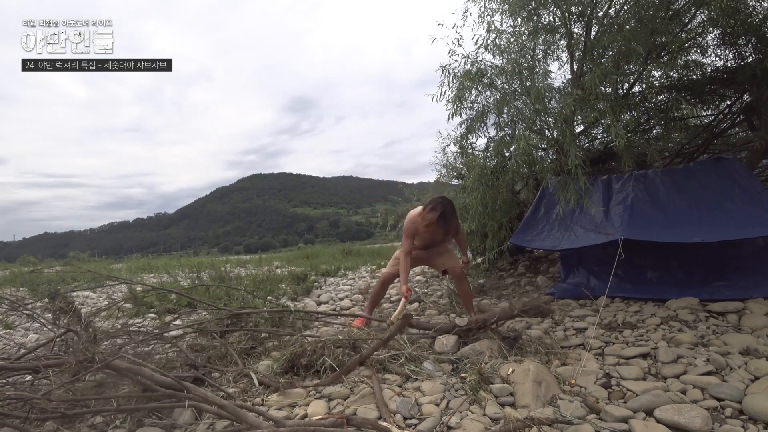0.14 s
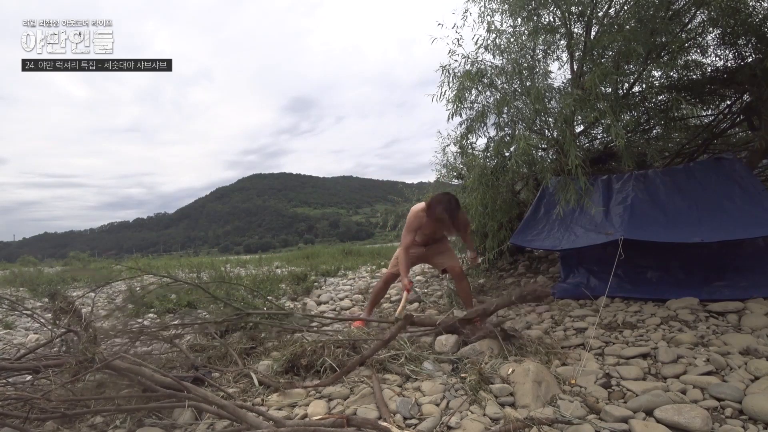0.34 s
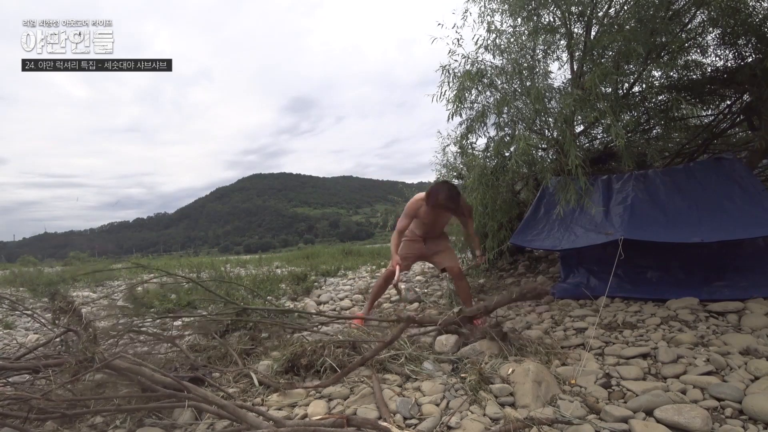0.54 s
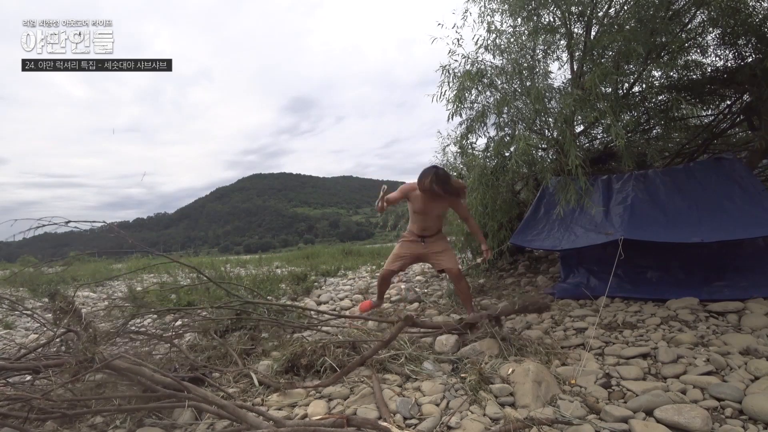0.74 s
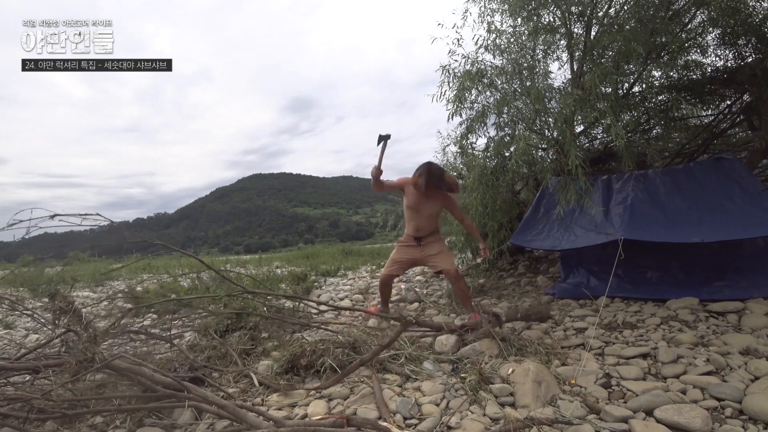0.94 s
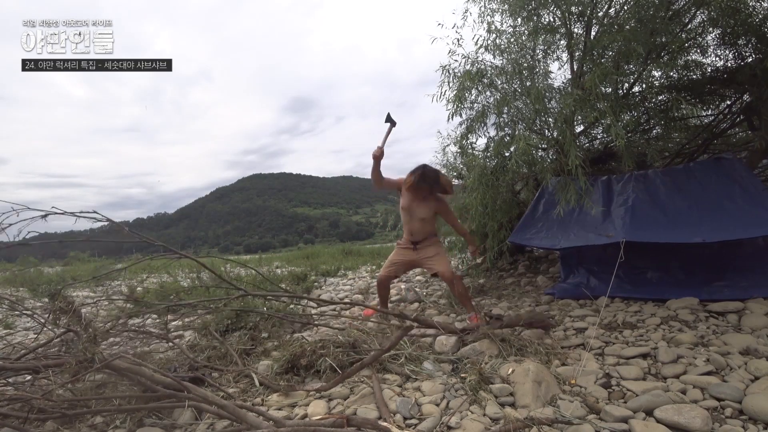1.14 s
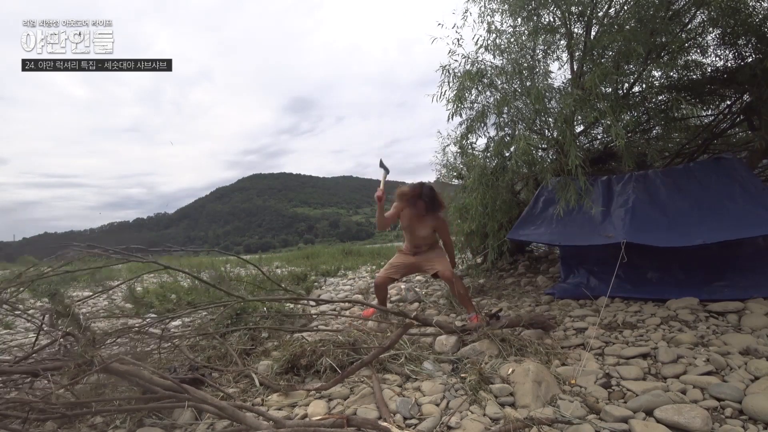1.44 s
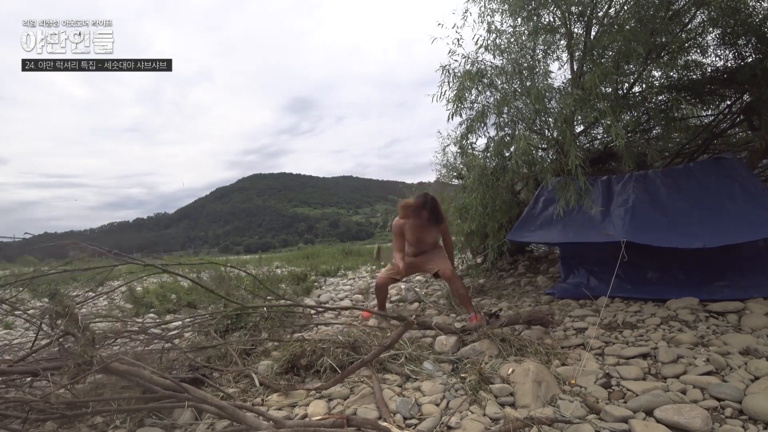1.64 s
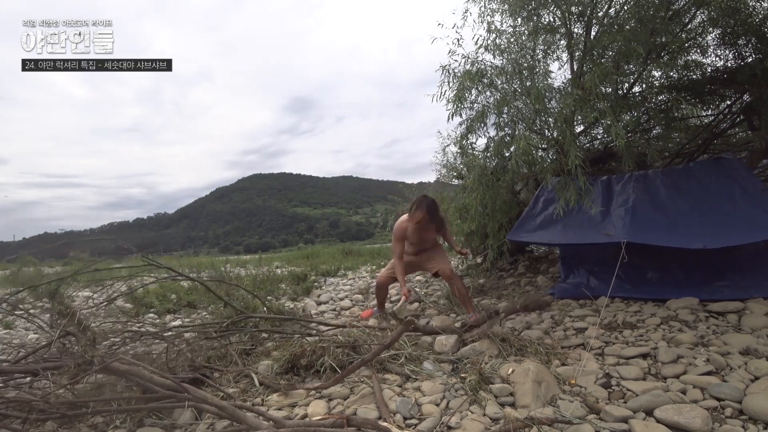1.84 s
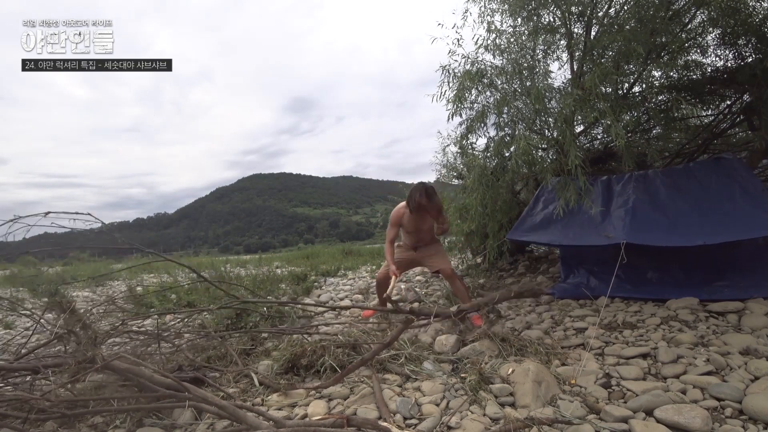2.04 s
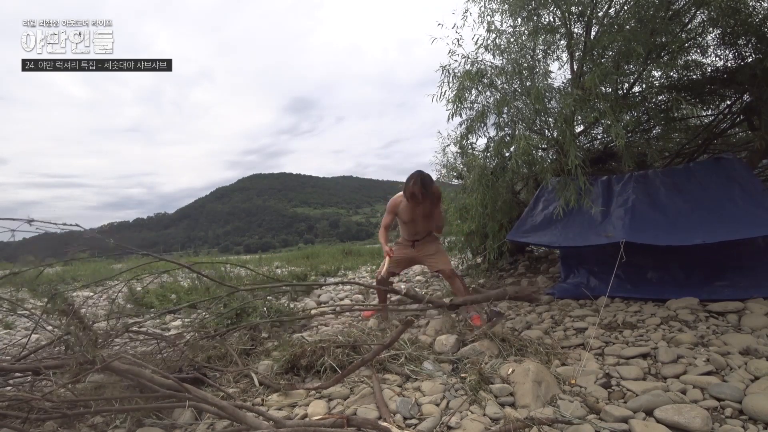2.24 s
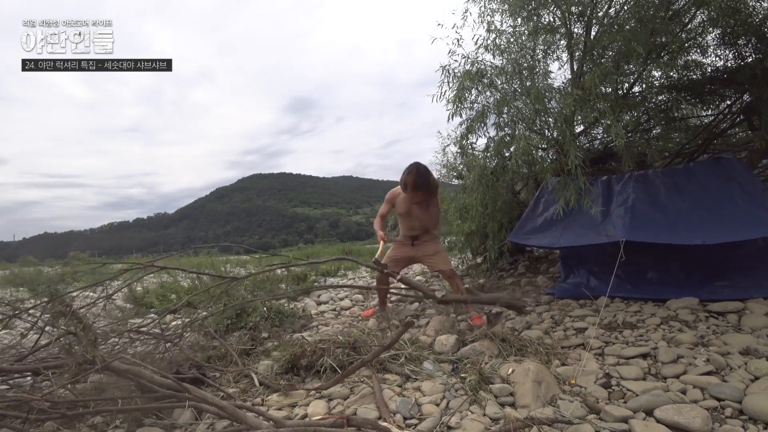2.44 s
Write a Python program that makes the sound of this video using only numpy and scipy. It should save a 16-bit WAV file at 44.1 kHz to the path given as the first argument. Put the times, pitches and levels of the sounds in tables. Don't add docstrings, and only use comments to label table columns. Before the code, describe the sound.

Two sharp hatchet hits on a branched log on an open stony riverbank, each followed by crackling, clashing twigs; between them wood knocks and drags softly on stones. Small camera microphone, little deep bass or extreme treble.

```python
import sys
import numpy as np
from scipy import signal
from scipy.fft import rfft, irfft, next_fast_len
from scipy.io import wavfile
from scipy.ndimage import uniform_filter1d

SR = 44100
rng = np.random.default_rng(int(sys.argv[2]) if len(sys.argv) > 2 else 0)


def gain_from_db(level_db):
    decades = np.asarray(level_db, float) / 20
    return 10 ** decades


def dump_mix(stems):
    frames = np.atleast_2d(stems).T
    limited = np.clip(frames, -1, 1)
    pcm = np.round(limited * 32767).astype(np.int16)
    wavfile.write(sys.argv[1], SR, pcm)


N = 114660
T = np.arange(N) / SR

# start_s, level_db (peak), pitch_hz (crack), decay_s (crack), thud_db
BLOWS = [(.2470, -2, 3130, 0.0019, -11.5), (.2487, -11.5, 1600, .0025, -6),
         (.2525, -12.5, 2230, 0.0069, -3), (.2553, -6.5, 3320, 0.0037, -14),
         (.2828, -5.5, 1250, 0.0034, -4.5), (.292, -12.5, 1320, 0.0036, -5), (.2815, -7, 2230, 0.0037, -7),
         (1.7915, -8.5, 3080, 0.0029, -20), (1.793, -4, 2400, 0.0031, -21), (1.800, -11, 1470, 0.0089, -11),
         (1.8145, -6, 2100, 0.004, -15), (1.820, -10, 2380, 0.0091, -9), (1.838, -11.5, 1580, 0.0069, -7),
         (1.843, -14, 1650, 0.0033, -6), (1.827, -18, 820, 0.0044, -5)]
# start_s, level_db (peak), pitch_hz, decay_s
BOOMS = [
    (.249, -19, 290, .01),
    (.283, -24, 270, .007),
    (1.814, -20, 510, .012),
    (1.80, -26, 330, .008),
]
# start_s, level_db (peak), pitch_hz, decay_s
KNOCKS = [(0.905, -24, 900, .003), (0.909, -17.5, 500, 0.0052), (.968, -31, 700, .003),
          (.937, -31, 1250, 0.003), (1.277, -27.5, 710, 0.0021), (2.213, -26.5, 1000, 0.0075),
          (2.33, -27, 1100, .004), (0.929, -24, 1110, 0.017), (0.952, -32, 1200, 0.0035),
          (1.025, -23, 1210, 0.014), (1.084, -22, 1110, 0.0022), (1.097, -27, 800, 0.0032),
          (1.141, -24.5, 905, 0.0033), (1.198, -24.5, 1010, 0.0042), (1.31, -22.5, 470, 0.0085),
          (1.333, -29, 965, 0.0034), (1.395, -25.5, 1030, 0.0077), (1.415, -25.5, 880, 0.0065),
          (1.454, -24, 450, 0.0064), (1.473, -27, 480, 0.0035), (1.687, -26, 483, 0.0091),
          (1.726, -26, 970, 0.0091), (2.274, -28, 1300, 0.0079), (2.319, -26, 865, 0.0059),
          (2.454, -27, 447, 0.0045), (2.574, -31, 1260, 0.0063)]
# start_s, level_db (peak), pitch_hz, decay_s, brightness_db
SNAPS = [(0.2887, -23, 5270, 0.001, -8), (.2883, -12, 11100, .0007, -6), (.2965, -24, 5000, .0015, -12),
         (0.2597, -7, 3240, .001, -14), (.3515, -21, 6200, 0.0011, -6), (0.366, -14, 5200, .0015, -8),
         (0.3715, -6, 3700, 0.0015, -9), (0.4047, -16, 2470, 0.0026, -12), (0.409, -12, 3210, .0015, 3.5),
         (.4172, -7, 6300, 0.0016, -1), (.4215, -6.5, 3450, 0.0042, -15), (.4245, -18, 10500, .001, -6),
         (0.4602, -9.5, 3380, 0.0044, -12), (.497, -9.5, 2460, 0.012, -24), (.4995, -8, 2520, .002, -14),
         (.506, -26, 8000, .0012, -7), (0.527, -16, 5770, 0.0017, -9), (.815, -24.5, 2780, 0.0037, -14),
         (0.85, -23.5, 2880, 0.0084, -6), (1.084, -26, 9800, .0012, 1), (1.0897, -22.5, 4020, 0.0028, 1),
         (1.1095, -21, 3630, 0.0022, -11), (1.1266, -14.5, 5400, 0.00092, 4),
         (1.1269, -14, 2590, 0.00056, 4.5), (1.1294, -22.5, 3000, 0.0034, 9),
         (1.274, -25, 3540, 0.0039, -6), (1.541, -19, 2350, 0.002, -14), (1.555, -19.5, 2720, 0.0044, -11),
         (1.593, -27.5, 3460, 0.0059, -3), (1.6653, -21, 4000, 0.002, -2), (1.6998, -23, 5000, 0.0013, 5.5),
         (1.7017, -18.5, 5060, 0.00062, 4.5), (1.787, -24, 3070, .004, -8),
         (1.7932, -10.5, 5040, .0014, -8), (1.839, -19, 6460, 0.0017, -8), (1.8665, -24, 5940, 0.0016, -3),
         (2.005, -12.5, 3450, 0.0047, -2), (2.0946, -20, 2140, 0.004, -2),
         (2.242, -14.5, 2670, 0.0038, -13), (2.522, -21.5, 2860, 0.0069, -18)]
# peak_s, level_db, rise_s (before the peak), decay_s (after it)
BURSTS = [(0.34, -20.5, 0.016, 0.013), (0.367, -17.5, 0.0033, 0.01), (0.4, -19.5, 0.0086, 0.031),
          (0.45, -23, 0.0021, 0.026), (0.51, -23.5, 0.015, 0.0083), (0.5, -36, 0.0053, 0.007),
          (1.395, -44, .003, 0.0094), (2.455, -37, 0.0069, 0.0087), (1.792, -23, 0.0036, 0.0049),
          (0.732, -35.5, 0.0066, 0.017), (1.876, -32, 0.0074, 0.011), (1.908, -24.5, 0.026, 0.037),
          (2.007, -24, 0.0024, 0.0044), (2.096, -28, 0.0027, 0.015), (2.235, -31.5, 0.014, 0.0071),
          (2.29, -34, 0.014, 0.0092), (.93, -35.5, .004, .01), (1.025, -37.5, .006, 0.015),
          (2.9, -35, .002, 0.0044), (2.39, -44, 0.0036, 0.007)]
# time_s, level_db
SHAKE = [(0, -43), (.243, -50), (.25, -51), (.275, -31.5), (.3, -26.5), (.5, -27), (.59, -34), (.64, -43),
         (1.0, -38.5), (1.75, -41.5), (1.786, -56), (1.795, -34), (1.86, -23.5), (1.95, -25.5),
         (2.05, -32.5), (2.2, -37.5), (2.4, -40), (2.6, -38.5)]
# time_s, level_db
DRAG = [(0, -51), (.245, -55), (.26, -28.5), (.45, -36.5), (.62, -47.5), (.88, -45), (.94, -34),
        (1.05, -45.5), (1.45, -38.5), (1.65, -45), (1.785, -45), (1.8, -25.5), (1.9, -39.5), (2.18, -41),
        (2.215, -38), (2.335, -33), (2.37, -41.5), (2.6, -46.5)]
# start_s, end_s, pitch_hz, level_db
SQUEAKS = [
    (2.21, 2.285, 1290, -36),
    (2.2, 2.34, 880, -42.5),
]
# pitch_hz, width_hz, level_db
LOG_MODES = [(624, 120, -12), (904, 134, -2.5), (1280, 12.5, -6.5), (1808, 46, -4.5), (2304, 100, -4.5)]
# pitch_hz, width_hz, level_db
THUD_MODES = [(292, 122, 2), (418, 81, 4), (630, 420, -3), (794, 49, 4), (926, 89, -28.5), (1180, 130, 1)]
# freq_hz, level_db (per Hz)
SPLINTER_COLOUR = [(300, -6.5), (800, -0.5), (2500, -2.5), (4200, -6), (6300, -10), (7000, -54),
                   (11000, -29)]
# freq_hz, level_db (per Hz)
SNAP_COLOUR = [(600, -5.5), (1500, 6), (6000, -0.5), (11000, -9.5)]
# freq_hz, level_db (per Hz)
TWIG_COLOUR = [(300, -11.5), (1150, -6.5), (2900, 0.5), (4000, -2), (4700, -7), (6300, -8.5), (7100, -14),
               (10600, -20.5)]
# freq_hz, level_db (per Hz)
RIVER_COLOUR = [(24, -75), (40, -14), (304, -6.5), (395, -16), (435, -12), (608, -20), (3730, -33),
                (12000, -51), (15600, -101), (22000, -120)]
# freq_hz, level_db
WIDE_COLOUR = [(300, -21), (2500, -10.5), (8000, -2.5), (12000, -4)]
# freq_hz, difference_db
PORT_DB = [(60, 0.5), (190, -6), (350, -9.5), (1120, -6), (2020, -5.5), (3630, -2.5), (6530, 2),
           (11700, -6)]
# freq_hz, lead_rad
PORT_RAD = [(30, 0), (600, 0.83), (1500, 0.94), (2400, 0.64), (4500, 0.9), (5800, 0.54), (11000, .05)]
# freq_hz, level_db
MIC_RESPONSE = [(30, -14.5), (100, -4.5), (160, 1), (11000, -0.5), (11600, -10.5), (12100, -48),
                (12500, -60)]

TWIG_CLICKS_PER_S, TWIG_SPREAD_DB, TWIG_PATCHY_DB, TWIG_PAN_DB = 1500, 3, 1.7, 4.5
DRAG_CLICKS_PER_S, DRAG_SPREAD_DB = 2000, 3.5
THUD_DECAY_S, SQUEAK_WIDTH_HZ, RIVER_DB = .011, 14, -42.5


def curve(rows):
    return gain_from_db(np.interp(T, *np.array(rows).T))


def unit(x):
    return x / np.sqrt(np.mean(x ** 2))


def over_hz(points, size):
    hz, value = np.array(points, float).T
    bins_hz = np.arange(size // 2 + 1) * SR / size
    return np.interp(np.log(np.maximum(bins_hz, 1)), np.log(hz), value)


def colour(x, points):
    cepstrum = irfft(over_hz(points, 2048) * np.log(10) / 20)
    cepstrum[1:1024] *= 2
    cepstrum[1025:] = 0
    response = irfft(np.exp(rfft(cepstrum)))[:1024]
    return signal.fftconvolve(x, response)[:len(x)]


def ring(x, hz, width_hz):
    return signal.lfilter(*signal.iirpeak(hz, hz / width_hz, SR), x)


def walk(rate):
    k = int(SR / rate)
    steps = np.repeat(rng.standard_normal(N // k + 1), k)
    smooth = uniform_filter1d(uniform_filter1d(steps, k), k)
    return unit(smooth[:N])


def clicks(rate, spread_db):
    chance, side, size = rng.random((3, N))
    hardness = np.minimum(-np.log(size + 1e-9), 4)
    return unit((chance < rate / SR) * np.sign(side - .5) * gain_from_db(spread_db * hardness))


def strike(rows, width, wide, wide_db, thud=False):
    size = 4096
    out = np.zeros(N + size)
    t = np.arange(size) / SR
    for row, noise in zip(rows, rng.standard_normal((len(rows), size))):
        s, db, hz, decay = row[:4]
        push = noise * np.exp(-t / max(decay, .0004)) * np.minimum(t / 0.00082, 1)
        click = 8 * .004 / decay * (np.arange(size) == 26)
        hit = ring(ring(push + click, hz, hz * width), hz, hz * width * 2)
        broad = colour(push, wide)
        hit = hit / abs(hit).max() + gain_from_db(wide_db) * broad / abs(broad).max()
        if thud:
            slow = noise[::-1] * np.exp(-t / THUD_DECAY_S)
            body = sum(gain_from_db(d) * ring(slow, f, w) for f, w, d in THUD_MODES)
            hit += gain_from_db(row[4]) * body / abs(body).max()
        start = int(s * SR)
        out[start:start + size] += gain_from_db(db - 3.0) * hit
    return out[:N]


def blows():
    cracks = strike(BLOWS, .3, SPLINTER_COLOUR, -8, thud=True)
    return cracks + strike(BOOMS, 0.21, SPLINTER_COLOUR, -28)


def snaps():
    return sum(strike([row], .3, SNAP_COLOUR, row[4]) for row in SNAPS)


def grains():
    total = np.zeros(N)
    for hz in 350 * 1.4 ** np.arange(11):
        contacts = clicks(TWIG_CLICKS_PER_S * np.sqrt(hz / 2000), TWIG_SPREAD_DB)
        rattle = unit(ring(contacts, hz, hz * 0.35))
        total += rattle * gain_from_db(TWIG_PATCHY_DB * walk(90)) * np.sqrt(hz)
    return unit(colour(total, TWIG_COLOUR))


def twigs():
    power = (curve(SHAKE) * gain_from_db(walk(200))) ** 2
    for s, db, rise, decay in BURSTS:
        shape = np.where(T < s, (T - s) / rise, (s - T) / decay)
        power += gain_from_db(2 * db) * np.exp(shape * 2)
    return [np.sqrt(power) * grains() for _ in range(2)]


def knocks():
    return strike(KNOCKS, 0.42, SPLINTER_COLOUR, -1)


def drag():
    scrape = ring(clicks(DRAG_CLICKS_PER_S, DRAG_SPREAD_DB), 580, 930) * gain_from_db(3.2 * walk(70))
    total = gain_from_db(-8.0) * ring(scrape, 1086, 930)
    for k, (hz, width_hz, db) in enumerate(LOG_MODES):
        total += (-1) ** k * gain_from_db(db) * ring(scrape, hz, width_hz)
    return curve(DRAG) * unit(total)


def squeak():
    total = np.zeros(N)
    for start, end, hz, db in SQUEAKS:
        gate = np.clip(np.minimum(T - start, end - T) / 0.0084, 0, 1)
        total += gain_from_db(db) * gate * unit(ring(clicks(900, 1.54), hz, SQUEAK_WIDTH_HZ))
    return total


def river():
    water = colour(rng.standard_normal(N), RIVER_COLOUR)
    octaves = 50 * 2. ** np.arange(9)
    return gain_from_db(RIVER_DB) * unit(sum(gain_from_db(1.5 * walk(10.4)) * ring(water, hz, hz * 0.7) for hz in octaves))


def ports(x, pan_db=0):
    size = next_fast_len(N + 4096)
    half = gain_from_db((over_hz(PORT_DB, size) + pan_db) / 2) * np.exp(.5j * over_hz(PORT_RAD, size))
    middle = abs((half + 1 / half) / 2)
    spectrum = rfft(x, size)
    return np.array([irfft(spectrum * g / middle, size)[:N] for g in (half, 1 / half)])


def scene():
    bed, other = twigs()
    wood = blows() + knocks() + drag() + squeak()
    dry_twigs = bed + snaps()
    spread = colour(other + gain_from_db(2) * river() + gain_from_db(-1) * drag(), WIDE_COLOUR)
    return ports(wood + river()) + ports(dry_twigs, TWIG_PAN_DB) + spread * np.array([[1], [-1]])


def roll_off(x):
    return signal.sosfilt(signal.butter(12, 12330, fs=SR, output="sos"), x)


def record(dry):
    limited = np.tanh(1.051 * dry) / 1.137
    heard = np.array([colour(channel, MIC_RESPONSE) for channel in limited])
    return roll_off(heard)


dry = scene()
out = record(dry)
dump_mix(out)
```